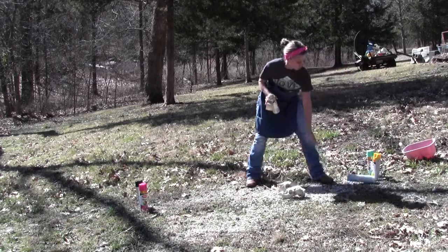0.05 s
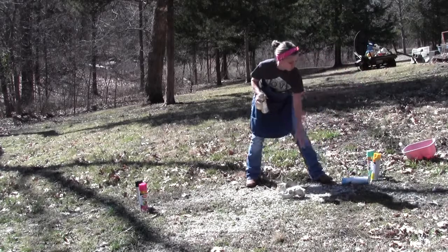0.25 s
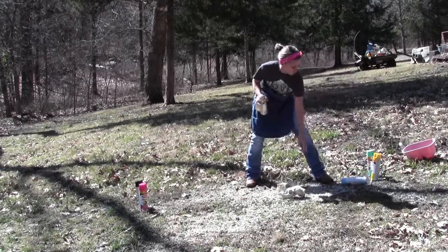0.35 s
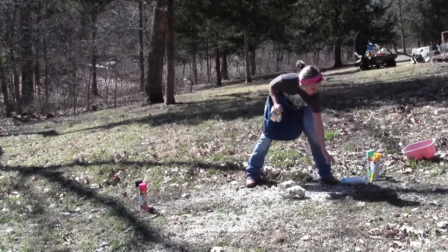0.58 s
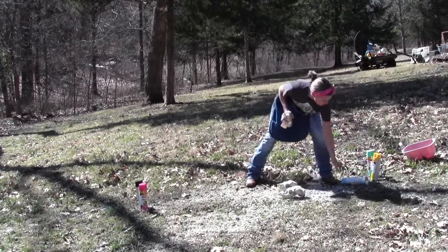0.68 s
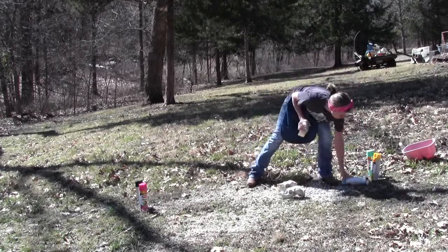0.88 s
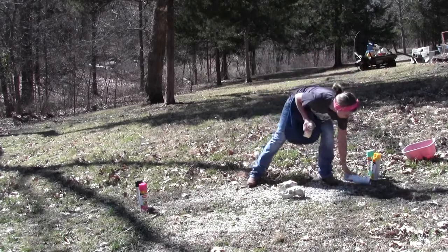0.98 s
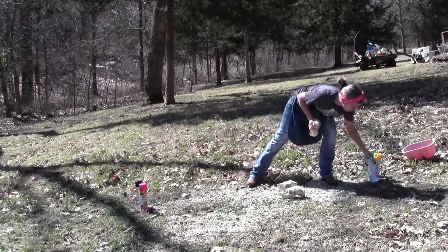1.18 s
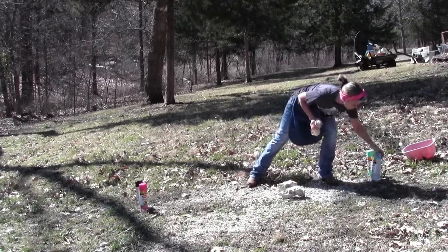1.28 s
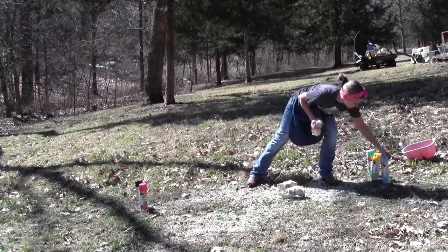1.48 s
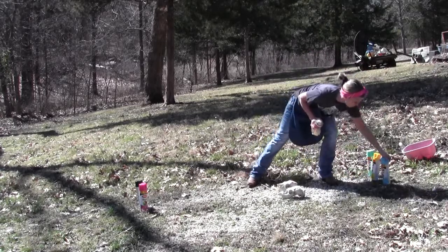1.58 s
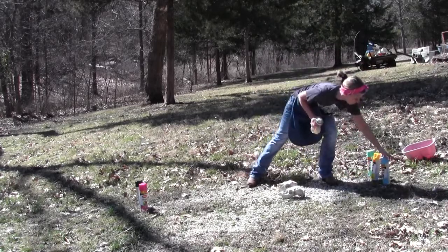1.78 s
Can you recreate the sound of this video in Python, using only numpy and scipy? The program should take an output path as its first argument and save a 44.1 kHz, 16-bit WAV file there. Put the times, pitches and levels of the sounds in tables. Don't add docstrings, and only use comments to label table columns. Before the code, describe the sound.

Hollow steel spray cans clank and knock outdoors, with a rattling mixing ball and dry leaf scuffs

```python
import sys
import numpy as np
from scipy import signal
from scipy.fft import rfft, irfft, next_fast_len
from scipy.io import wavfile
from scipy.ndimage import uniform_filter1d

SR = 44100
rng = np.random.default_rng(int(sys.argv[2]) if len(sys.argv) > 2 else 0)


def volts_from_decibels(level):
    exponent = np.asarray(level, float) / 20
    return 10 ** exponent


def store_pcm(level_fs):
    pcm = np.round(np.clip(level_fs, -1, 1) * 32767).astype(np.int16)
    wavfile.write(sys.argv[1], SR, np.atleast_2d(pcm).T)


N = 81585


def unit(x):
    return x / np.sqrt(np.mean(x ** 2) + 1e-20)


def along(points, hz):
    f, v = np.transpose(points)
    return np.interp(np.log(hz + 1), np.log(f + 1), v)


def filtered(x, response):
    m = next_fast_len(x.shape[-1] + 8192)
    spectrum = rfft(x, m) * response(np.fft.rfftfreq(m, 1 / SR))
    return irfft(spectrum, m)[..., :x.shape[-1]]


def add(track, s, sound):
    part = track[int(max(s, 0) * SR):][:len(sound)]
    part += sound[:len(part)]


def ring(modes, sag=0., attack_s=0.0003, scatter_db=1.5, detune=0., tilt_db=0., free_s=np.inf):
    sag_s, grip_t60_s = 0.02, 0.05
    slosh_hz, slosh = 59, 0.71
    hz, db, t60 = np.transpose(modes)[:, :, None]
    t60 = np.minimum(t60, 0.11 * (3000 / hz) ** 2)
    t = np.arange(int(min(t60.max(), 0.5) * SR)) / SR
    level_chance, pitch_chance = rng.standard_normal((2, len(modes), 1))
    knots = rng.standard_normal((2, len(modes), 128))

    def wander(part):
        return np.array([np.interp(t * slosh_hz, np.arange(len(k)), k - k[0]) for k in part])

    shake = slosh * (hz / 2200) ** 1.24
    swell = 1 + np.tanh(shake * wander(knots[0])) / 2
    held_t = t - sag * sag_s * (1 - np.exp(-t / sag_s))
    phase = 2 * np.pi * hz * (1 + detune * pitch_chance) * held_t
    waves = swell * np.sin(phase + shake * wander(knots[1]))
    level_db = db + tilt_db * np.log2(hz / 4000) + scatter_db * level_chance
    grip_db = 60 * np.maximum(t - free_s, 0) / grip_t60_s
    decay = volts_from_decibels(level_db - 60 * t / t60 - grip_db)
    return (decay * waves).sum(0) * (1 - np.exp(-t / attack_s))


def burst(spectrum, t60, grit_db, tilt_db=0., rise=0.0015):
    t = np.arange(SR // 4) / SR
    bumps_db = 3 * rng.standard_normal(32)

    def colour(hz):
        ripple_db = np.interp(hz / 800, np.arange(len(bumps_db)), bumps_db)
        return volts_from_decibels(along(spectrum, hz) + ripple_db + tilt_db * np.log2((hz + 100) / 2000))

    noise = unit(filtered(rng.standard_normal(len(t)), colour))
    low = filtered(noise, lambda hz: 1 / (1 + (hz / 5000) ** 2))
    grit = volts_from_decibels(grit_db * unit(uniform_filter1d(rng.standard_normal(len(t)), size=40)))
    decaying = low * volts_from_decibels(-60 * t / t60) + (noise - low) * volts_from_decibels(-60 * t / (0.68 * t60))
    return grit * decaying * (1 - np.exp(-t / (rise * t60)))


# (frequency [Hz], density [dB per Hz])
CRACK_SPECTRUM = [(150, -66), (250, -6), (1500, 0.5), (2500, 0.5), (6800, -12.5), (10500, -17),
                  (13000, -35), (15000, -36)]


def contacts(modes, hits, sag=0., attack_s=0.0003, free_s=np.inf):
    out = np.zeros(N)
    for s, ring_db, crack_db, t60, tilt_db in hits:
        add(out, s, volts_from_decibels(ring_db) * ring(modes, sag, attack_s, free_s=free_s))
        add(out, s, volts_from_decibels(crack_db) * burst(CRACK_SPECTRUM, t60, 0.95, tilt_db))
    return out


# (time [s], ring [dB], crack [dB], crack t60 [s], crack tilt [dB per octave])
FALLING_MODES = [(1270, -21, 0.027), (1350, -7.5, 0.46), (1397, -3.5, 0.14), (1412, -7.5, 0.38),
                 (2034, -5, 0.069), (2136, -17.5, 0.14), (2618, -14, 0.15), (2820, -15, 0.17),
                 (3086, -9.5, 0.12), (3614, -8, 0.12), (4170, -14.5, 0.1)]
FALLING_HITS = [(0, -58.5, -57.5, 0.96, 2.5), (0.2347, -38.5, -30.5, 0.037, -2),
                (0.245, -41, -26, 0.047, -1), (0.2474, -29.5, -24.5, 0.025, -3),
                (0.2515, -32.5, -27, 0.012, -4.5), (.254, -45, -35.5, 0.14, 1),
                (.284, -52, -39.5, 0.038, -3.5), (0.3316, -42, -33, 0.018, -2.5),
                (.352, -65, -39, 0.038, -1.5), (0.356, -60, -37.5, 0.035, -6), (.393, -71, -33, 0.023, -4),
                (0.3985, -46, -30, 0.014, -8)]


def falling_can():
    return contacts(FALLING_MODES, FALLING_HITS)


# (frequency [Hz], density [dB per Hz])
HUSH_SPECTRUM = [(12, -54), (20, -9.5), (155, -4.5), (183, -6), (310, -6.5), (1170, -15.5), (1680, -14.5),
                 (1880, -16.5), (15000, -34)]
# (frequency [Hz], correlation [-1 to 1])
HUSH_LIKENESS = [(30, 0.092), (80, 1), (240, 0.2), (940, 0.05), (3700, 0.68), (14000, 0.174)]


def hush():
    hush_db, hum_hz, hum_db = -58.5, 150.9, -72
    z = signal.stft(rng.standard_normal((2, N)), nperseg=512)[2]
    field = rng.standard_normal(z.shape[1:])
    for axis in (0, 1):
        field = uniform_filter1d(field, size=8, axis=axis)
    pair = signal.istft(z * volts_from_decibels(1.38 * unit(field)), nperseg=512)[1][:, :N]

    def mid_side(hz):
        turn = np.arccos(np.clip(along(HUSH_LIKENESS, hz), -1, 1)) / 2
        return volts_from_decibels(along(HUSH_SPECTRUM, hz)) * np.array([np.cos(turn), np.sin(turn)])

    mid, side = filtered(pair, mid_side)
    air = unit(np.array([mid + side, mid - side]))
    hum = unit(filtered(rng.standard_normal(N), lambda hz: 1 / (1 + ((hz - hum_hz) / 5) ** 2)))
    return volts_from_decibels(hush_db) * air + volts_from_decibels(hum_db) * hum


# (frequency [Hz], density [dB per Hz])
SCUFF_SPECTRUM = [(240, -61), (400, -4.5), (1140, -1.5), (2470, -6), (10100, -29.5), (15000, -45)]
# (time [s], level [dB], t60 [s], tilt [dB per octave])
SCUFFS = [(0.048, -52.5, .03, 1), (0.064, -49, 0.038, 1.5), (.381, -52, 0.26, 4), (.403, -45.5, 0.27, 3.5),
          (.412, -47, 0.2, 2), (.421, -52, .03, 4), (1.2642, -47.5, 0.038, -1.5), (1.29, -52, 0.0924, -0.5),
          (1.404, -49.5, 0.068, -3), (1.464, -56.5, 0.12, 2), (1.672, -50.5, 0.033, 1.5),
          (1.682, -44.5, 0.039, 3.5), (1.695, -45.5, 0.066, 9), (1.735, -46, 0.028, 3.5),
          (1.743, -49, .05, 3), (1.801, -55, 0.17, -3)]


def leaves():
    out = np.zeros(N)
    for s, db, t60, tilt_db in SCUFFS:
        add(out, s, volts_from_decibels(db) * burst(SCUFF_SPECTRUM, t60, grit_db=3.0, tilt_db=tilt_db, rise=0.012))
    return out


# (frequency [Hz], level [dB], t60 [s])
BALL_MODES = [(1400, -8, .012), (3550, 0, .011), (4460, -9, .008), (5680, -2, .012), (8700, -4, .007),
              (9550, -6, .006), (12400, -13, .008)]
# (time [s], level [dB], tilt [dB per octave], crack over ring [dB])
TICKS = [
    (0.142, -61.5, 11, 1),
    (0.176, -60.5, 6, -4.5),
    (1.486, -23, -1.5, -13.5),
    (1.6426, -32, -0.5, -12),
    (1.7025, -38.5, 3, -8),
    (1.7503, -37, 1.5, -4.5),
    (1.7951, -37.5, -0.5, -11),
    (1.7991, -42.5, 2, -5.5),
    (1.819, -43.5, 0.5, -9),
    (1.8405, -43.5, 2, -8.5),
]


def mixing_ball():
    out = np.zeros(N)
    for s, db, tilt_db, crack_db in TICKS:
        tick = ring(BALL_MODES, attack_s=0.00026, scatter_db=1.0, detune=0.0067, tilt_db=tilt_db)
        add(out, s, volts_from_decibels(db) * tick)
        add(out, s, volts_from_decibels(db + crack_db) * burst(CRACK_SPECTRUM, 0.022, 3.5, 3 + tilt_db))
    return out


# (frequency [Hz], level [dB], t60 [s])
BASE_MODES = [(350, -11, .014), (490, -.5, .021), (630, -5.5, .012), (800, -7, .01)]
# (time [s], peak [dB])
THUDS = [(0.176, -43), (0.2365, -44), (0.247, -24), (0.284, -28), (0.332, -31), (0.354, -33), (.367, -35.5),
         (0.398, -26), (0.42, -33.5), (0.458, -36), (0.511, -31.5), (0.576, -34.5), (0.956, -34.5),
         (1.031, -36), (1.681, -38.5)]


def base_thuds():
    out = np.zeros(N)
    for s, db in THUDS:
        add(out, s, volts_from_decibels(db + 4) * ring(BASE_MODES, attack_s=0.0015, scatter_db=2, detune=0.03))
    return out


STRUCK_MODES = [(1104, -1, 0.075), (1945, 6.5, 0.12), (2055, -1.5, 0.15), (2340, -13, 0.2),
                (2450, -30, 0.35), (2540, -5.5, 0.12), (2715, -5.5, 0.27), (3530, -7, 0.16),
                (4250, -2.5, 0.097), (4810, -4.5, 0.1)]
STRUCK_HITS = [
    (.436, -32, -31.5, 0.073, 3.7),
]


def struck_can():
    return contacts(STRUCK_MODES, STRUCK_HITS, sag=0.0643)


ROLLING_MODES = [(1345, -3, 0.12), (1178, -8.5, 0.058), (1960, -3, 0.1), (2527, -7.5, 0.16),
                 (2465, -4.5, 0.13), (3890, -20, 0.2)]
ROLLING_HITS = [
    (0.469, -40, -60, 0.026, -3),
    (.501, -35.5, -32, 0.053, 0),
    (.551, -36, -41.5, 0.059, 4.5),
    (0.609, -50.5, -51.5, 0.091, 6.5),
]


def rolling_can():
    return contacts(ROLLING_MODES, ROLLING_HITS)


LIFTED_MODES = [(1356, -13.5, 0.16), (2429, -0.5, 0.068), (2700, -5, 0.042), (3590, -4, 0.036),
                (3812, -9.5, 0.08), (4046, -7.5, 0.052), (4540, -4, .07), (4820, -11, 0.07),
                (5520, -18, 0.05)]
LIFTED_HITS = [
    (0.9491, -34, -40.5, 0.047, 9.5),
]


def lifted_can():
    return contacts(LIFTED_MODES, LIFTED_HITS)


JOLTED_MODES = [(1360, -15, 0.19), (2326, 1, 0.043), (2700, -2.5, 0.029), (3490, -13, .09),
                (4870, -12, 0.045), (5470, -9, .04)]
JOLTED_HITS = [
    (0.9934, -41.5, -48.5, 0.062, 6),
    (1.028, -50.5, -47.5, 0.049, 2),
    (1.046, -51, -50, 0.061, 4.5),
]


def jolted_can():
    return contacts(JOLTED_MODES, JOLTED_HITS)


KNOCKED_MODES = [(2350, -1, 0.025), (2550, 2, 0.022), (3700, -1, .025), (6700, -17, 0.012)]
KNOCKED_HITS = [
    (1.077, -42, -44, 0.019, 8.7),
]


def knocked_can():
    return contacts(KNOCKED_MODES, KNOCKED_HITS)


GRAZED_MODES = [(1690, -0.5, 0.19), (2210, 1, 0.092), (2960, -5, .1), (4910, -7, .08)]
GRAZED_HITS = [
    (1.1, -52, -54, 0.15, 1.2),
]


def grazed_can():
    return contacts(GRAZED_MODES, GRAZED_HITS)


TILTED_MODES = [(1380, -10.5, 0.22), (1670, -13.5, 0.18), (2250, -5.5, 0.0815), (2390, 8, 0.019),
                (2520, -8, 0.1), (3510, -6, 0.065), (3570, -5, 0.1), (4650, -7, 0.038)]
TILTED_HITS = [
    (1.13, -42, -36.5, 0.015, 17),
    (1.1458, -48, -47, 0.054, 1.3),
]


def tilted_can():
    return contacts(TILTED_MODES, TILTED_HITS)


NUDGED_MODES = [(1240, -7, 0.48), (1398, -10.5, .5), (1526, -5.5, .35), (1553, 6, 0.042), (1770, 6, 0.02),
                (2210, -1.5, 0.05), (2470, -7, 0.044), (2820, -11, 0.11), (5270, -0.5, 0.05)]
NUDGED_HITS = [
    (1.449, -64, -51.5, 0.092, 10),
    (1.569, -40, -35, 0.028, -0.5),
    (1.7025, -56.5, -37.5, 0.024, -0.5),
]


def nudged_can():
    return contacts(NUDGED_MODES, NUDGED_HITS, sag=0.038, free_s=0.066)


PLACED_MODES = [(1200, -20.5, 0.19), (1402.3, -1, 0.11), (1490, -10, 0.065), (2030, -14.5, 0.14),
                (2555, -1.5, 0.057), (2700, -14, 0.12), (2906, -3, 0.064), (3630, -18, 0.046),
                (4350, -4, 0.033), (5087, -2.5, .07)]
PLACED_HITS = [
    (1.4857, -57, -33, 0.015, -2.5),
    (1.492, -27.5, -35.5, 0.062, 2.5),
]


def placed_can():
    return contacts(PLACED_MODES, PLACED_HITS, sag=0.039, attack_s=0.007)


# (frequency [Hz], t60 [s])
TREES_T60 = [(1000, 0.24), (10000, 0.088)]


def trees(x):
    hz, t, z = signal.stft(rng.standard_normal((2, SR // 3)), SR, nperseg=256)
    z = z[0] + 0.2 * z * [[[0]], [[1]]]
    decay = volts_from_decibels(-60 * t / along(TREES_T60, hz)[:, None])
    tail = signal.istft(z * decay, SR, nperseg=256)[1]
    delayed = np.pad(x, (150, 0))[None]
    return signal.fftconvolve(delayed, tail / np.linalg.norm(tail[0]), axes=1)[:, :N]


# (frequency [Hz], left over right [dB])
LEFT_OVER_RIGHT = [(500, .4), (5000, .4), (10000, 4.5)]
# (frequency [Hz], left lead [rad])
LEFT_LEAD = [(6000, 0), (10000, -.4), (12500, -1.8)]


def two_ports(hz):
    half = [0.5, -0.5]
    return volts_from_decibels(np.outer(half, along(LEFT_OVER_RIGHT, hz))) * np.exp(1j * np.outer(half, along(LEFT_LEAD, hz)))


def scene():
    foot_hz, trees_db = 225, -14.5
    sources = [falling_can, leaves, mixing_ball, base_thuds, struck_can, rolling_can, lifted_can, jolted_can,
               knocked_can, grazed_can, tilted_can, nudged_can, placed_can]
    near = sum(source() for source in sources)
    near = filtered(near, lambda hz: (1j * hz / foot_hz / (1 + 1j * hz / foot_hz)) ** 2)
    wet = near + volts_from_decibels(trees_db) * trees(near)
    return filtered(wet, two_ports) + hush()


def roll_off(x):
    return signal.sosfilt(signal.butter(12, 15290, fs=SR, output="sos"), x)


def record(dry):
    top_hz, roll_db, steepness = 15200, -7.5, 4.8

    def microphone(hz):
        return (hz < top_hz) * volts_from_decibels(roll_db * np.minimum(hz / top_hz, 1) ** steepness)

    mix = filtered(dry, microphone)
    return roll_off(mix)


dry = scene()
out = record(dry)
store_pcm(out)
```